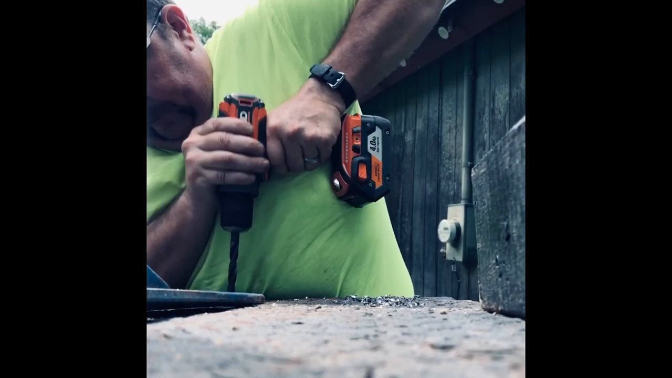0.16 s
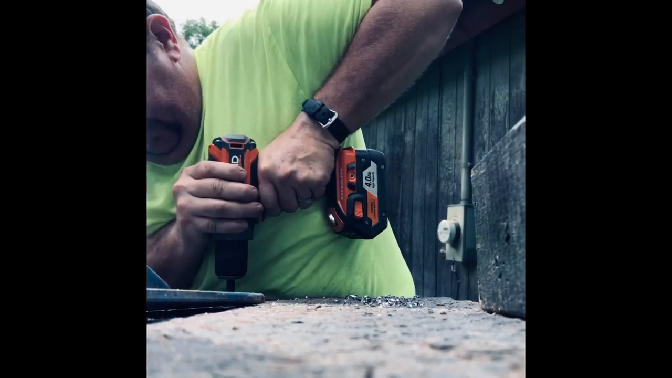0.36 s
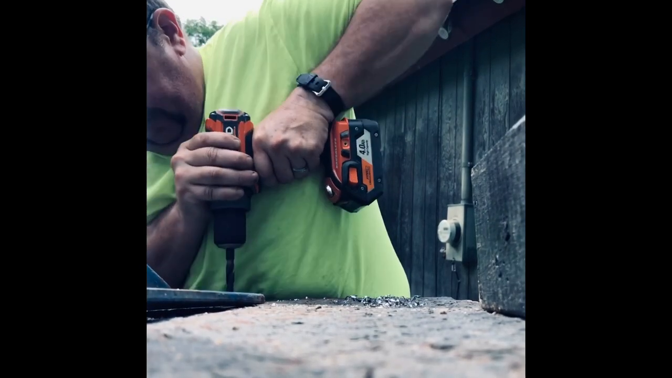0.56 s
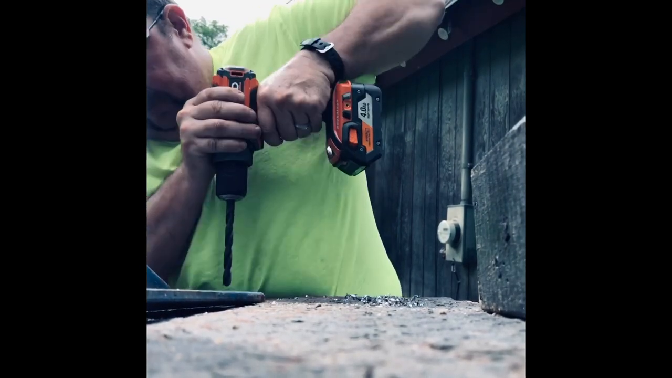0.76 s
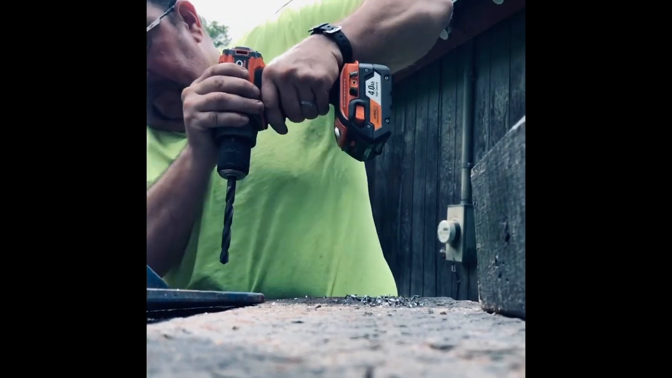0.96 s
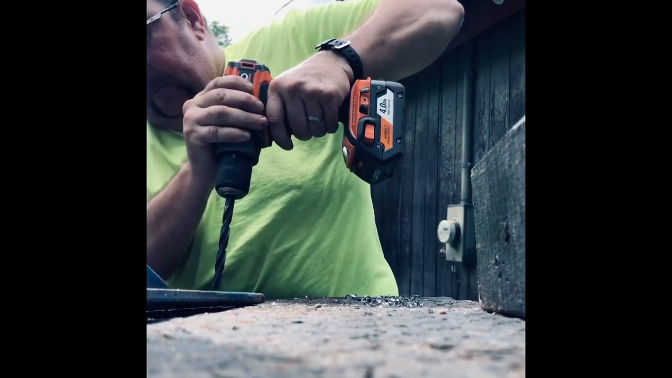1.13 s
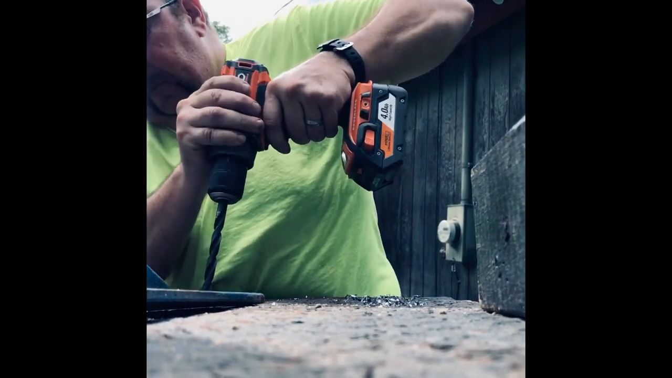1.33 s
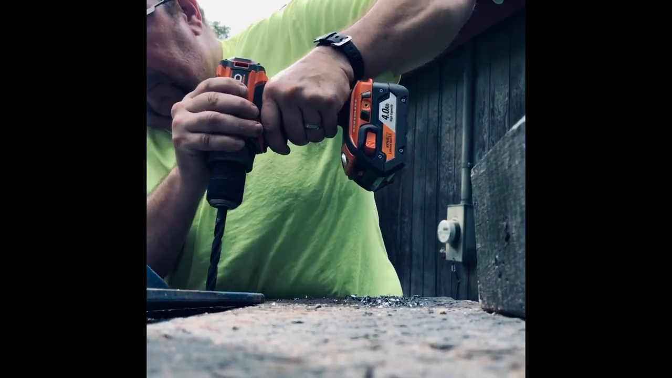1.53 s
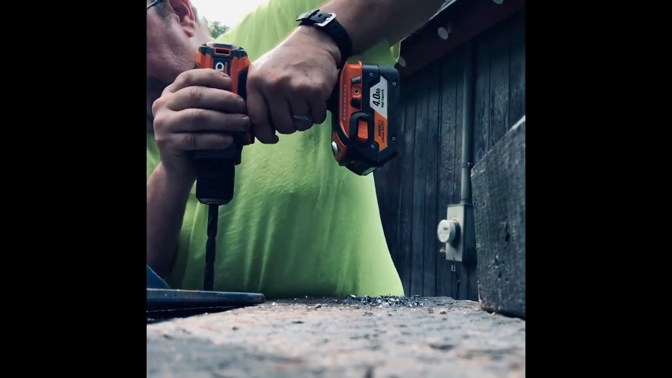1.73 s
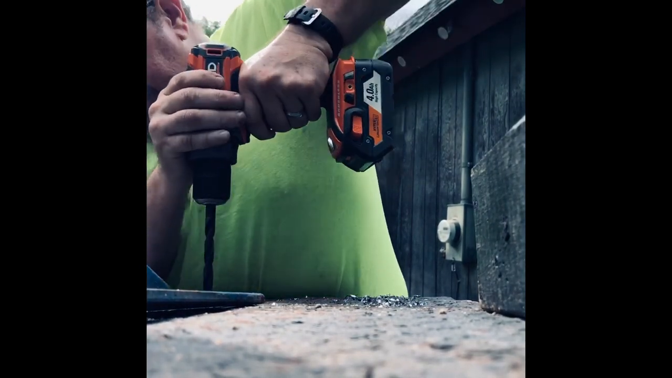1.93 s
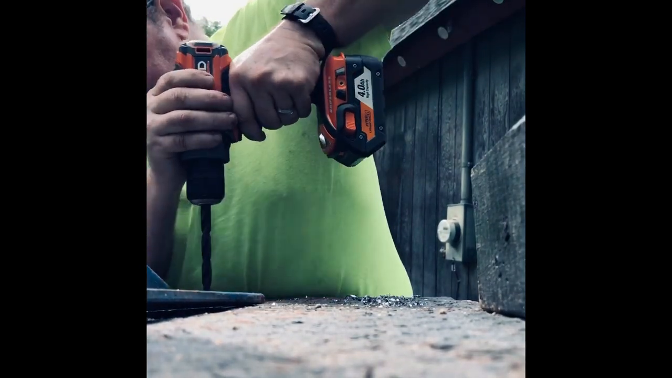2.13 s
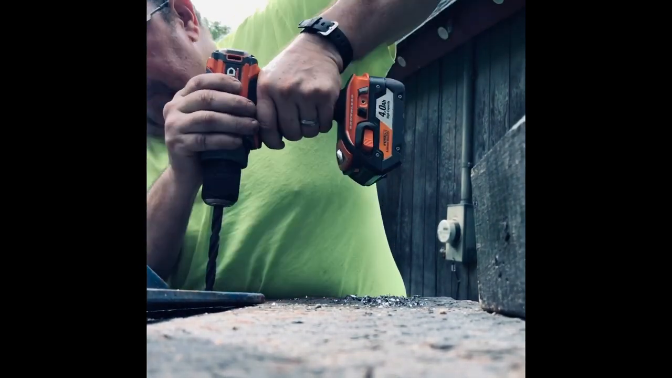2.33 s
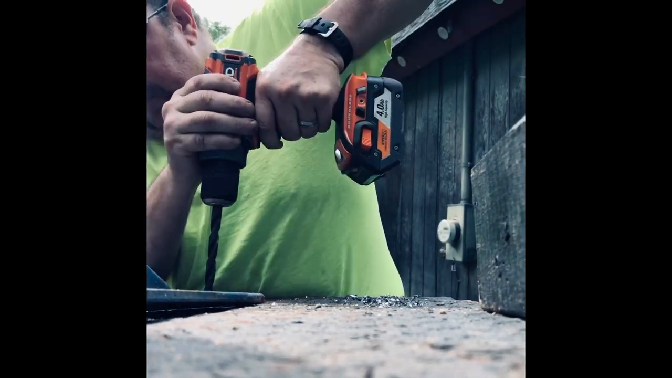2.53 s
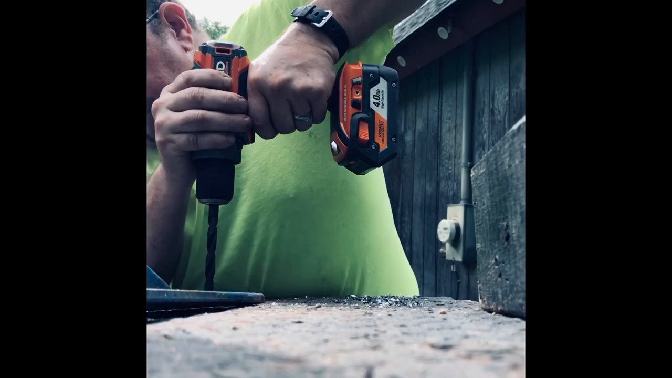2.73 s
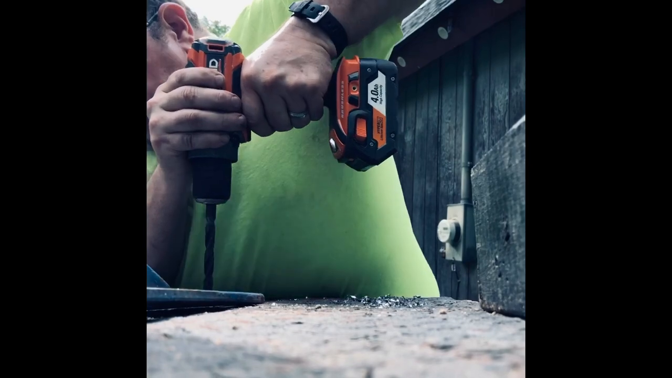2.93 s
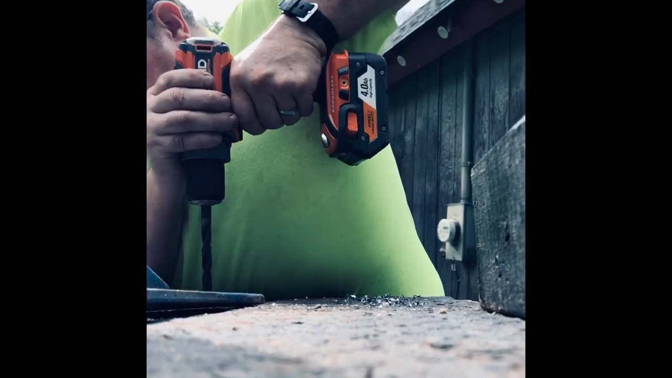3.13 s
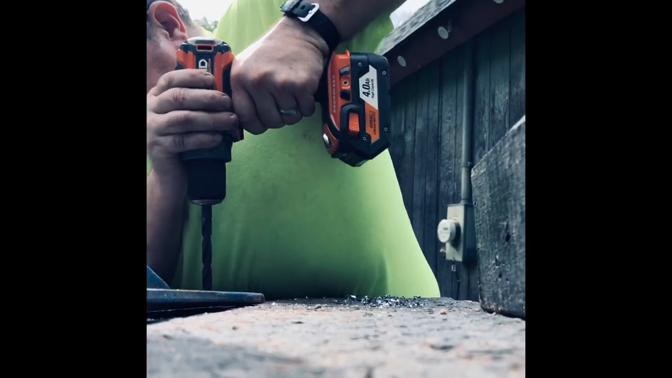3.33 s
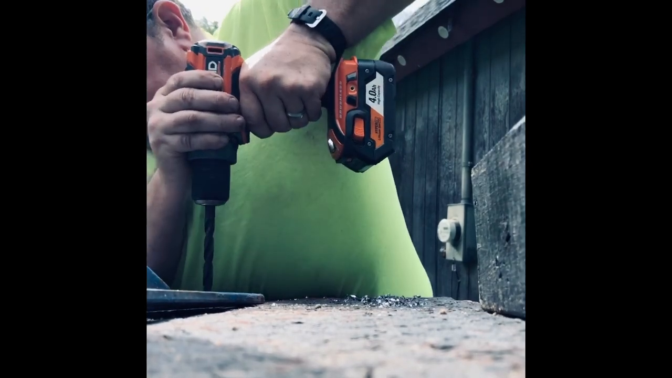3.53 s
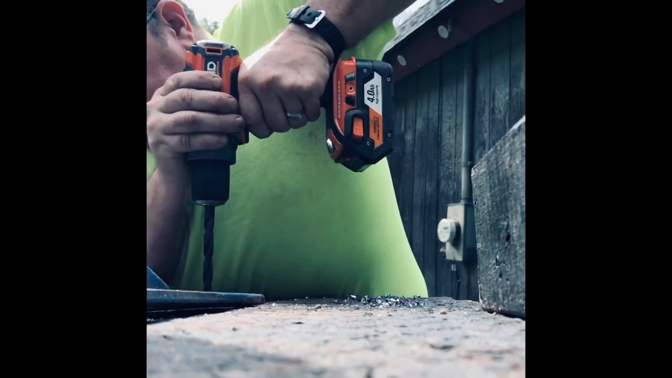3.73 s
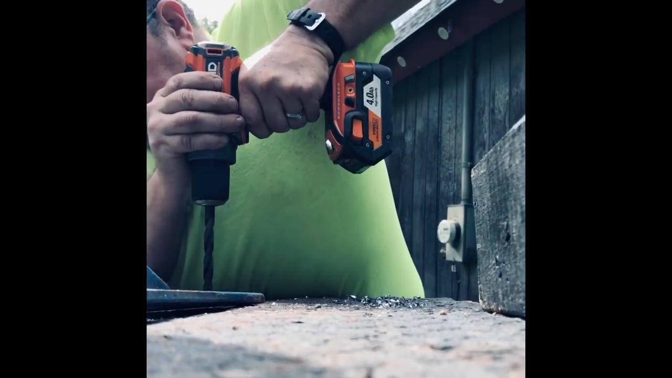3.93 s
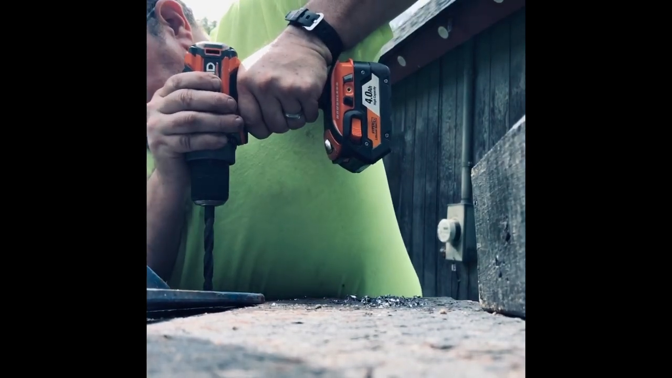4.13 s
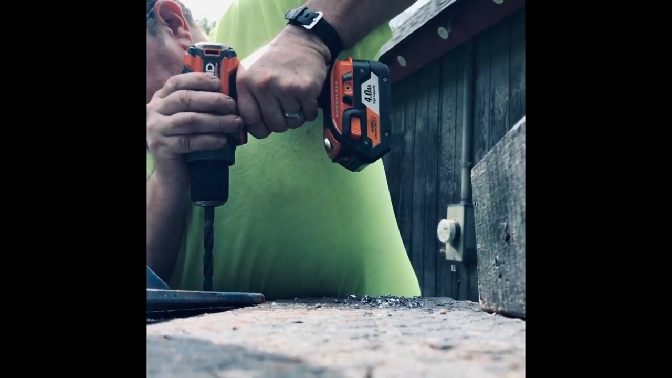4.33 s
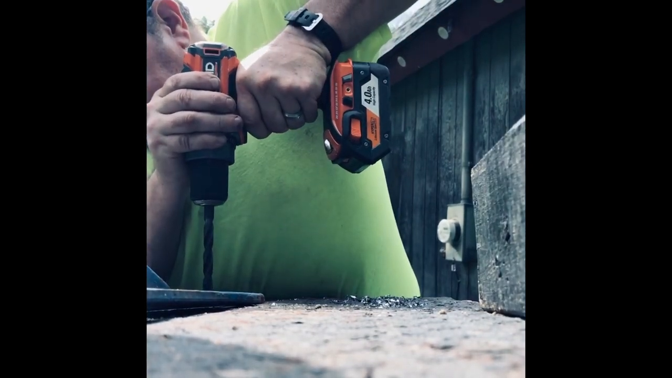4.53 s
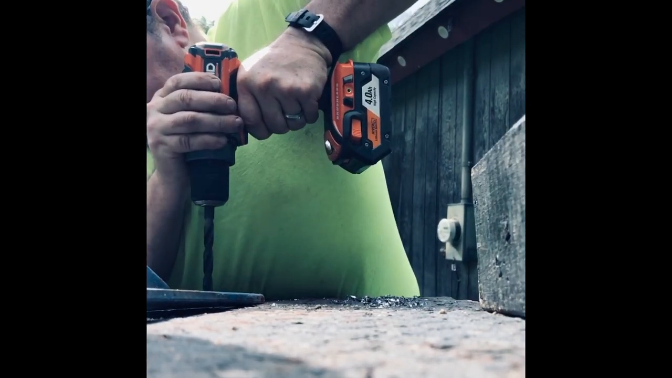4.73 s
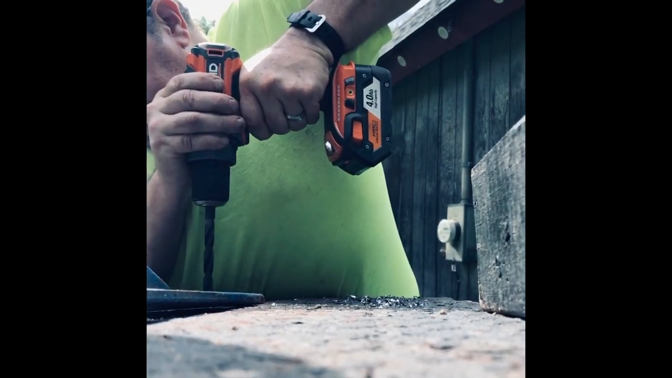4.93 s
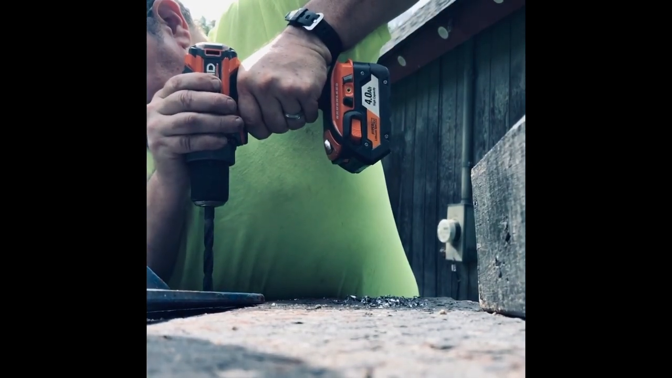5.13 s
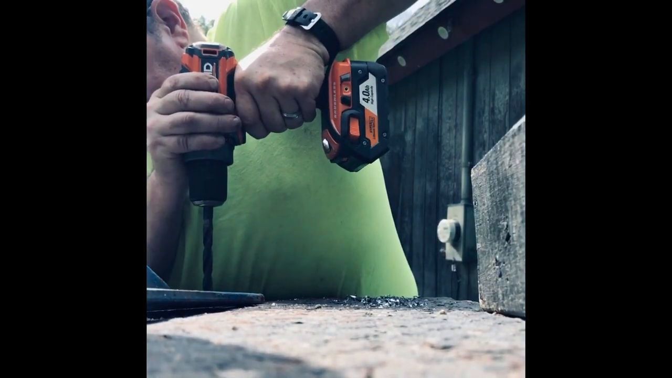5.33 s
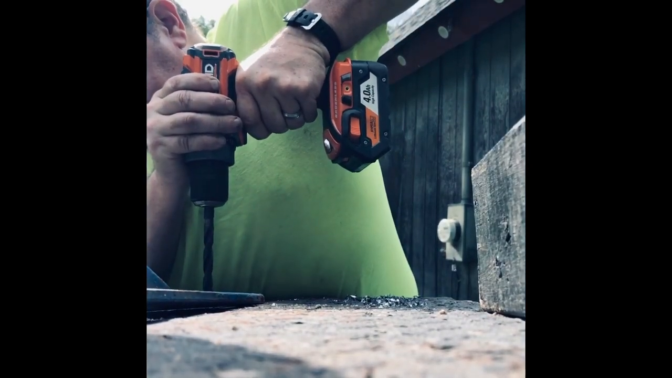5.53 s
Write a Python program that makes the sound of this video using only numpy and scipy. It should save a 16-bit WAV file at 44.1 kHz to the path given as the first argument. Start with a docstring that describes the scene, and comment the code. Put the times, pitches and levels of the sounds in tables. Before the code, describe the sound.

Close cordless drill whines and grinds through sheet steel, brakes to a stop, knocks in a quiet gap, then bores on, catching rhythmically.

```python
"""First the snap and grind of a bit in sheet steel, close to the microphone, and the whine of a cordless drill's gears.
The brake drops the pitch; in the pause the bit knocks and is set down, and a mains hum shows through the far yard.
After brief touches of the trigger a second, longer bore binds and catches once a turn.
Gears and whistle are sines that follow the motor speed, cutting and air are coloured noise, knocks are ringing modes;
a wall answers shortly, and the truck bed booms under the work."""
import sys
import numpy as np
from scipy import signal
from scipy.fft import rfft, irfft, next_fast_len
from scipy.io import wavfile
from scipy.ndimage import uniform_filter1d, map_coordinates

SR = 44100
rng = np.random.default_rng(int(sys.argv[2]) if len(sys.argv) > 2 else 0)


def dump(signal):
    """Clip the signal to [-1, 1] and save it as 16-bit WAV at the path in sys.argv[1]."""
    limited = np.clip(np.atleast_2d(signal).T, -1, 1)
    pcm = np.round(limited * 32767).astype(np.int16)
    wavfile.write(sys.argv[1], SR, pcm)


def linear_from_db(decibels):
    """Turn decibels (scalar or array-like) into linear amplitude factors; 0 gives 1."""
    return 10 ** (np.asarray(decibels, float) / 20)


N = 245195
T = np.arange(N) / SR  # seconds

# Far yard noise. Each row: frequency in Hz, relative density in dB per Hz.
YARD = [(18, -50), (35, -30), (64, -14), (93, -18), (125, 3), (170, -4.5), (335, -4), (430, -7.5),
        (1180, -13.5), (2270, -23.5), (3940, -21.5), (9000, -35.5), (15800, -56)]
# Mains hum: frequency in Hz, level in dB.
HUM = (120.5, -40.5)
YARD_DB, YARD_SWELL_DB, YARD_SWELL_S = -45, 3.5, (0.93, 1.52)  # level, rise, and when it rises

# Boom of the truck bed. Each row: frequency in Hz, relative density in dB per Hz.
BOOM = [(60, -50), (110, -13), (170, -7), (230, -2), (260, -1), (330, -18), (600, -70)]
# Shake of the truck bed. Each row: frequency in Hz, relative density in dB per Hz.
DEEP = [(20, -60), (35, -25), (48, -7), (65, 1.5), (95, 6), (130, -15), (250, -70)]
# Weight shifting on the truck. Each row: time in seconds, level in dB.
LEAN = [(0, -43), (.5, -47), (.66, -37), (.91, -42), (1.31, -66), (1.47, -38.5), (1.9, -54), (2.14, -62),
        (2.7, -60), (2.94, -34.5), (3.78, -40.5), (4.23, -56), (5.0, -51), (5.35, -52), (5.56, -59)]
# The boom's base level belongs to that side pressure; it grows in dB per dB and sinks as the bit binds.
BOOM_DB, BOOM_GROWS, BOOM_AT_DB, BOOM_SINKS_DB = -25.5, 0.85, -16, -3.5

# Trigger part-pressed. Each row: on in seconds, off in seconds, housing buzz in dB, the same at the end in dB.
TOUCH = [(1.898, 2.05, -34, -41), (2.659, 2.72, -45, -19)]
# Speed control singing during a touch. Each row: frequency in Hz, end frequency in Hz, level in dB.
SWITCH = [(10150, 9800, -41), (10200, 10450, -45)]
TOUCH_EDGE_S = 0.016

# Bit on the rim of the hole. Each row: start in seconds, relative level in dB.
KNOCK = [(.466, -9), (.483, -13), (.509, -9), (0.532, -3.5), (0.555, -11), (0.584, -17), (0.606, -23),
         (.694, -13), (1.434, -16), (1.444, -18.5), (1.466, -22), (1.483, -19), (1.496, -19.5), (1.51, -31),
         (1.539, -27.5), (1.607, -26), (1.665, -35)]
# Modes of the sheet when knocked. Each row: frequency in Hz, relative level in dB, 60 dB decay in seconds.
RIM = [(241, -14, 0.1), (315, -22, 0.36), (438, -2, 0.052), (493, 3, 0.053), (577, -2, 0.042),
       (1030, -13, 0.035)]
# Low tone already ringing as we begin: start in seconds, frequency in Hz, level in dB, 60 dB decay in seconds.
LINGERING_RING = (-1.2, 311.5, -35, 4)

# Single catches of the bit and knocks of the chuck.
# Each row: start in seconds, relative level in dB, centre in Hz, relative crackle level in dB.
CATCH = [(0.0124, -2.5, 3390, -13), (0.0196, 0, 4200, -15), (0.0259, 0.5, 4170, -21),
         (0.0444, -7, 3450, -10), (0.4964, -2, 4120, -24), (0.603, -4.5, 3480, -8),
         (0.6384, -7.5, 3350, 2.5), (0.6764, -9.5, 3650, -4), (0.8264, -7, 2740, -31),
         (1.4247, -35, 3900, -8), (1.4855, -35, 3440, -10), (1.914, -29, 3100, -7),
         (2.424, -24.5, 3700, -20), (2.4897, -28, 4920, -12), (2.4974, -32.5, 2890, -9),
         (2.6708, -28, 3126, -5), (2.6963, -15, 2990, -18), (2.7282, 3, 3090, -36),
         (2.8087, -0.5, 3050, -23), (2.8792, -14, 3190, -21), (3.0174, -5, 3163, -9),
         (3.0794, -6, 3130, -12)]
# A binding bit catches at this part of each turn, give or take the scatter (both in turns).
SNAG_TURN, SNAG_SCATTER = 0.5, 0.05
SNAG_DB, SNAG_SPREAD_DB, SNAG_TOP_DB = -3.5, 1, -27  # relative levels as in CATCH
SNAG_HZ, SNAG_OCTAVES, SNAG_OVER = 3158, 0.2014, 0.4  # centre, its spread, the binding it takes

# Bit against steel, one table a spell. Each row: time in seconds, side pressure on the panel in relative dB,
# cutting in relative dB.
CONTACT = [
    [(0, -17.5, -18.5), (.033, -21, -22), (.04, -21.5, -21), (.09, -17.5, -18), (.14, -24.5, -24),
     (.174, -24, -32), (.272, -23.5, -33.5), (.288, -17.5, -27), (.406, -26, -27), (.46, -21.5, -27.5),
     (.486, -15.5, -23.5), (.58, -16, -29), (.672, -16, -30), (.766, -23.5, -40), (.852, -37, -42),
     (.914, -32, -29.5), (.942, -47, -83), (.95, -47, -71)],
    [(1.41, -62, -71), (1.422, -41, -50), (1.508, -44, -61), (1.586, -52, -77), (1.66, -63, -72)],
    [(1.9, -55, -64), (1.91, -48, -47.5), (2.0, -33.5, -35), (2.05, -32.5, -36.5), (2.075, -42, -58)],
    [(2.66, -52, -51), (2.68, -41, -43), (2.7, -27.5, -28), (2.726, -22, -23), (2.75, -14, -20),
     (2.8, -15.5, -21), (2.95, -16, -22.5), (3.47, -13.5, -20), (3.64, -18.5, -22), (4.25, -15.5, -18.5),
     (4.48, -17.5, -17.5), (4.85, -16.5, -17.5), (5.56, -19, -19)],
]
# Resonances of the bit. Each row: centre in Hz, width in Hz, relative height in dB.
BIT_MODES = [(1560, 59, 8), (2345, 18, 14.5), (2650, 28, 11.5), (2740, 20, 7), (2950, 54, 9.5),
             (3440, 16, 9), (3610, 16, 13), (3734, 105, 10.5), (4104, 17, 14), (4380, 107, 12.5),
             (4844, 68, 12.5), (5720, 100, 21)]
# Resonances of the panel. Each row: centre in Hz, width in Hz, relative height in dB.
PANEL = [(367.6, 21, 4.5), (506, 53, 3), (617.5, 2.9, 6), (1036, 29, 3)]
# Cutting noise. Each row: frequency in Hz, relative density in dB per Hz.
GRIND = [(500, -60), (900, -33), (1500, -2), (2000, -3), (2500, -1), (3300, 0), (4200, -3.5), (5000, -11),
         (6000, -23.5), (7500, -15), (12000, -60)]
# Panel rumble. Each row: frequency in Hz, relative density in dB per Hz.
RUMBLE = [(150, -41), (300, -2), (360, -5), (430, -4), (510, -2), (800, -6), (1500, -6), (2200, -13.5),
          (4000, -93)]
# Air, brushes and rubbing. Each row: frequency in Hz, relative density in dB per Hz.
HISS = [(1500, -81), (2940, 3), (5000, -2.5), (6870, -3.5), (8250, 0.5), (11100, -12), (15800, -13.5)]
SPRAY_DB, RUB_DB = -7.5, -18  # hiss relative to the cutting, and to the side pressure
AIR_DB, AIR_HZ, AIR_POWER = -28, 3330, 1.44  # relative air hiss at that gear mesh, its power of speed
AIR_CHOKE_DB = -6.5  # change of all the hiss when the bit binds hard
BRUSH_FOLLOWS, BRUSH_AT_DB = 0.29, -29  # brushes follow the cut (dB per dB), from that cutting level

# Motor speed before the sag, one table a burst. Each row: time in seconds, gear mesh in Hz.
SPEED = [
    [(.04, 2950), (.065, 2847), (.102, 2210), (.125, 2255), (.158, 2717), (.18, 3040), (.206, 3180),
     (.28, 3320), (.3, 3206), (.34, 3180), (.38, 3120), (.49, 3274), (.74, 3330), (.8, 3056), (.828, 2950),
     (.853, 2580), (.86, 2372), (.88, 1910), (.895, 1541), (.91, 1235), (.924, 982)],
    [(2.69, 498), (2.731, 1560), (2.75, 2500), (2.79, 2966), (2.82, 3120), (2.85, 3135), (2.95, 3180),
     (3.03, 3180), (3.12, 3046), (3.25, 3027), (3.45, 3031), (3.65, 3040), (4.05, 2950), (4.25, 2964),
     (4.65, 2950), (4.85, 2904), (5.47, 2919), (5.51, 2960), (5.56, 3064)],
]
# How hard the bit binds each turn. Each row: time in seconds, binding (1 = hard).
BIND = [(0, 0.084), (2.8, 0.26), (3.6, 0.17), (4.0, 0.32), (4.25, 0.54), (4.45, 0.92), (5.4, 0.93),
        (5.56, 0.19)]
# Load on the gear teeth. Each row: time in seconds, relative level in dB.
TORQUE = [(0, -31), (.07, -11), (.1, -7), (.145, 0), (.16, -11), (.2, -6.5), (.26, -17), (.34, -5),
          (.44, -8.5), (.49, -18), (.6, -9), (.74, -8), (.82, -22), (.83, 1.5), (.9, -12.5), (2.74, -30),
          (2.755, -5), (2.79, 5.5), (2.82, -7), (2.85, 6), (2.89, -4), (2.95, 0.5), (3.25, -4), (3.65, 0.5),
          (4.05, 4), (4.45, 0.5), (4.85, 0), (5.05, 0.5), (5.25, -1.5), (5.47, 0), (5.51, 6), (5.56, -3)]
# Whine by its pitch. Each row: frequency in Hz, relative level in dB.
GEARBOX = [(700, -62), (1500, -13), (2200, -21), (2600, -12.5), (2890, -18.5), (2950, -18), (3050, -9),
           (3150, -11), (3320, -11)]
# Whistle by its pitch. Each row: frequency in Hz, level in dB.
WHISTLE_LEVEL = [(4900, -60), (5250, -24.5), (5550, -20), (5900, -29), (6600, -24), (7000, -36.5),
                 (7250, -33), (7400, -26), (7490, -25.5), (7700, -20), (7880, -33)]
# Buzz partials. Each row: multiple of half the mesh, relative level in dB.
BUZZ = [(1, 0), (3, -20), (4, -15), (5, -17), (6, -23)]
# Housing resonance that lifts any buzz partial passing through: centre in Hz, width in Hz, lift in dB.
HOUSING = (3050, 450, 20)
# Relative levels in dB: fourth harmonic of the whine, second of the whistle.
OVERTONE_DB = (-35, -22)
MESH_PER_TURN, TURN_AT_S = 199.7, 4.8158  # mesh cycles a chuck turn; a moment when a turn begins
UNLOAD_DB, UNLOAD_NARROW = -19, 3  # depth (at full binding) and narrowness of the gap in the whine each turn
WHISTLE = 2.3765  # whistle pitch over gear mesh
CLIMB_HUSH_DB, CLIMB_HZ_PER_S = -12, 12000  # the whistle is held down while the motor climbs that fast
BRAKE_HUSH_S, BRAKE_HUSH_DB = 0.04, -25  # the brake hushes the whistle in that time
BRAKE_S, BRAKE_DB, BRAKE_FADE_HZ = 0.8265, -20, 2520  # brake grips; its relative buzz, fading under that mesh
JAM, JAM_DB, JAM_HZ_PER_S = 1.29, -24, 15000  # squeal over mesh, full when a jam drags the motor down that fast
SLACK_DB, SLACK_UNDER_DB = -33, -6  # relative buzz of loose teeth below that load


def unit(x):
    """Scale to rms 1."""
    return x / np.sqrt(np.mean(x ** 2) + 1e-20)


def curves(*tables, rest=-120):
    """One value per sample for each column; rest where no table runs."""
    out = np.full((len(tables[0][0]) - 1, N), float(rest))
    for s, *columns in map(np.transpose, tables):
        on = (T >= s[0]) & (T <= s[-1])
        out[:, on] = [np.interp(T[on], s, column) for column in columns]
    return out


def wobble(rate):
    """A smooth random curve, rate knots a second."""
    return map_coordinates(rng.standard_normal(int(N / SR * 1200)), [T * rate])


def level_at(spectrum, hz):
    """(Hz, dB) points read on a log axis."""
    at, db = np.transpose(spectrum)
    return np.interp(np.log(hz), np.log(at), db)


def shaped(x, spectrum, modes=(), lift_db=0):
    """x coloured by (Hz, dB) points, with resonances standing out of it, at rms 1."""
    m = next_fast_len(N + 8192)
    hz = np.fft.rfftfreq(m, 1 / SR)
    peaks = sum(linear_from_db(level + lift_db) ** 2 / (1 + (2 * (hz - centre) / width) ** 2)
                for centre, width, level in modes)
    gain = linear_from_db(level_at(spectrum, hz + 1)) * np.sqrt(1 + peaks)
    return unit(irfft(rfft(x, m) * gain, m)[:N])


def yard():
    """Far outdoor noise, swelling a little in the pause, and a nearly steady mains hum."""
    hz, db = HUM
    hum = linear_from_db(db + 0.7 * wobble(6)) * np.sin(2 * np.pi * hz * T + 0.2 * wobble(6))
    far_db = YARD_DB + np.interp(T, YARD_SWELL_S, [0, YARD_SWELL_DB]) + 0.32 * wobble(5.8)
    return linear_from_db(far_db) * shaped(rng.standard_normal(N), YARD) + hum


def truck(bind):
    """The whole bed booms under the pressure of the bit and shakes as the weight on it shifts."""
    pressure_db = curves(*CONTACT)[0]
    slow_torque_db = uniform_filter1d(curves(TORQUE)[0], size=SR // 4)
    boom_db = BOOM_DB + BOOM_GROWS * (pressure_db - BOOM_AT_DB) + BOOM_SINKS_DB * bind + 0.39 * slow_torque_db
    boom = linear_from_db(boom_db + 1.8 * wobble(6.5) + 3.0 * wobble(30)) * shaped(rng.standard_normal(N), BOOM)
    shake = linear_from_db(curves(LEAN)[0]) * shaped(rng.standard_normal(N), DEEP)
    return boom + shake


def trigger():
    """Part-pressed trigger: thin high tones, and the housing resonance rattled by the slow motor."""
    rattle = rng.standard_normal(N) * linear_from_db(3.9 * wobble(220))
    housing = shaped(rattle, [(1000, -80), (2000, -30), (2800, -5), (3150, 9), (3500, -20), (4500, -46),
                              (9000, -80)])
    out = np.zeros(N)
    for on, off, start_db, end_db in TOUCH:
        gate = np.clip(np.minimum(T - on, off + TOUCH_EDGE_S - T) / TOUCH_EDGE_S, 0, 1) ** 2
        out += gate * linear_from_db(np.interp(T, [on, off], [start_db, end_db])) * housing
        for hz, end_hz, db in SWITCH:
            pitch = np.interp(T, [on, off], [hz, end_hz])
            out += gate * linear_from_db(db + 2.3 * wobble(110)) * np.sin(2 * np.pi * np.cumsum(pitch) / SR)
    return out


def knocks():
    """Every knock rings the sheet's modes at new strengths, over one low tone that fades from the start."""
    out, t = np.zeros(N + SR), np.arange(SR // 2) / SR
    for s, db in KNOCK:
        spread_db = rng.normal(0, 2.5, len(RIM))
        ring = sum(linear_from_db(level + more - 60 * t / t60) * np.sin(2 * np.pi * hz * t)
                   for (hz, level, t60), more in zip(RIM, spread_db))
        out[round(s * SR):][:len(t)] += linear_from_db(db - 2.5) * ring * (1 - np.exp(-t / 0.0025))
    s, hz, db, t60 = LINGERING_RING
    lingering_db = db - 60 * (T - s) / t60 + 2.1 * wobble(24.5)
    return out[:N] + linear_from_db(lingering_db) * np.sin(2 * np.pi * hz * T)


def snags(angle, bind):
    """One catch a turn where the bit binds hard enough, as rows like those of CATCH."""
    turns = angle / (2 * np.pi)
    whole = np.arange(np.ceil(turns[0]), turns[-1] - 1)
    chance = rng.standard_normal((len(whole), 3))
    s = np.interp(whole + SNAG_TURN + SNAG_SCATTER * chance[:, 0], turns, T)
    db = SNAG_DB + SNAG_SPREAD_DB * chance[:, 1]
    hz = SNAG_HZ * 2 ** (SNAG_OCTAVES * chance[:, 2])
    rows = np.transpose([s, db, hz, np.full(len(s), SNAG_TOP_DB)])
    return list(rows[np.interp(s, T, bind) > SNAG_OVER])


def catches(angle, bind):
    """Each catch is a rough snap that rings the modes of the bit near it, with a crackle on top."""
    out, t = np.zeros(N + SR), np.arange(SR // 20) / SR
    modes, widths, levels = np.transpose(BIT_MODES)[..., None]
    for s, db, hz, top_db in CATCH + snags(angle, bind):
        noise = rng.standard_normal((3, len(t)))
        rough = unit(signal.lfilter([1], [1, -1.7, 0.7225], noise[:2]))  # spreads the snap about its centre
        carrier = rough[0] * np.sin(2 * np.pi * hz * t) + rough[1] * np.cos(2 * np.pi * hz * t)
        snap = 1.06 * carrier * linear_from_db(-60 * t / 0.029)
        # modes far from the snap, in octaves, ring less
        near_db = levels - 15.0 - 14 * np.abs(np.log2(modes / hz)) + rng.normal(0, 3.0, modes.shape)
        decay = np.exp(-2.5 * np.pi * widths * t)
        ring = np.sum(linear_from_db(near_db) * decay * np.sin(2 * np.pi * modes * t), axis=0)
        bright = unit(uniform_filter1d(np.gradient(noise[2]), size=3))
        crackle = linear_from_db(top_db + 8.0 - 60 * t / 0.021) * bright
        attack = 1 - np.exp(-t / 0.00069)
        out[round(s * SR):][:len(t)] += linear_from_db(db - 8.5) * (snap + ring + crackle) * attack
    return out[:N]


def bit(angle, bind, hz):
    """Chips tear off in clumps that ring the bit; the panel rumbles; air and brushes hiss most between bites."""
    rumble_db, grind_db = curves(*CONTACT)
    bite = bind * np.tanh(2.4 * np.cos(angle + 1.4 + 0.2 * wobble(12)))  # the edge digs in for half a turn
    chips = rng.standard_normal(N) * linear_from_db(1.0 * wobble(90) + 3.3 * wobble(600))
    grind = linear_from_db(grind_db + 2.5 + 3.1 * bite) * shaped(chips, GRIND, BIT_MODES, lift_db=-1.8)
    thuds = rng.standard_normal(N) * linear_from_db(1.36 * wobble(35) + 1.9 * wobble(140))
    rumble = linear_from_db(rumble_db - 1.9 + 1.0 * bite) * shaped(thuds, RUMBLE, PANEL, lift_db=2.5)
    flutter = rng.standard_normal(N) * linear_from_db(0.38 * wobble(25) + 1.54 * wobble(60) + 0.38 * wobble(550))
    spray = linear_from_db(grind_db + SPRAY_DB)
    rub = linear_from_db(rumble_db + RUB_DB)
    air = linear_from_db(AIR_DB + BRUSH_FOLLOWS * (grind_db - BRUSH_AT_DB)) * (hz / AIR_HZ) ** AIR_POWER
    hiss = np.linalg.norm([spray, rub, air], axis=0)  # powers add
    hiss = hiss * linear_from_db(2.5 + AIR_CHOKE_DB * bind - 2.7 * bite) * shaped(flutter, HISS)
    return grind + rumble + hiss


def shaft():
    """Mesh phase and chuck angle; the motor sags when the bit binds."""
    hz = curves(*SPEED, rest=100)[0]  # the motor is silent at this resting value
    cycles = np.cumsum(hz) / SR
    angle = 2 * np.pi * (cycles - cycles[round(TURN_AT_S * SR)]) / MESH_PER_TURN
    bind = curves(BIND)[0]
    sag = 0.019 * bind * np.cos(angle + 0.3) + 0.0031 * wobble(45)
    mesh = 2 * np.pi * np.cumsum(hz * (1 + sag)) / SR
    return mesh, angle, bind, hz


def motor(mesh, angle, bind, hz):
    """Gear whine that dips as teeth unload once a turn, a higher whistle, jam squeal and buzz of the teeth."""
    torque_db, running = curves(TORQUE)[0], hz > 200
    slope = np.gradient(hz) * SR  # Hz per second
    braking = (T > BRAKE_S) & (T < SPEED[1][0][0])

    gap = (0.5 + 0.5 * np.cos(angle - 2.6)) ** UNLOAD_NARROW
    load_db = bind ** 1.87 * (3.0 + UNLOAD_DB * gap)
    flicker_db = 0.62 * wobble(21.98) + 0.32 * wobble(70) + 1.2 * wobble(300)
    tone = np.sin(mesh + 0.23 * wobble(250)) + linear_from_db(OVERTONE_DB[0]) * np.sin(4 * mesh + wobble(250))
    whine = linear_from_db(level_at(GEARBOX, hz) + torque_db + load_db + flicker_db) * tone

    climbing = uniform_filter1d(np.clip(slope / CLIMB_HZ_PER_S, 0, 1), size=500)
    hush_db = CLIMB_HUSH_DB * climbing
    hush_db = hush_db + BRAKE_HUSH_DB * braking * np.clip((T - BRAKE_S) / BRAKE_HUSH_S, 0, 1)
    phase = WHISTLE * mesh + 0.34 * wobble(330)
    whistle_db = level_at(WHISTLE_LEVEL, WHISTLE * hz) + hush_db + 0.53 * wobble(20) + 2.2 * wobble(110)
    whistle = linear_from_db(whistle_db) * (np.sin(phase) + linear_from_db(OVERTONE_DB[1]) * np.sin(2 * phase))

    drag = uniform_filter1d(np.clip(-slope / JAM_HZ_PER_S, 0, 1), size=500) ** 2 * ~braking
    squeal = linear_from_db(JAM_DB + 2.5 * wobble(82)) * drag * np.sin(JAM * mesh + 0.5 * wobble(390))

    centre, width, lift_db = HOUSING
    buzz = np.zeros(N)
    for k, db in BUZZ:
        housing_db = lift_db / (1 + (2 * (k * hz / 2 - centre) / width) ** 2)
        partial_db = db + 2.0 * wobble(89.47) + housing_db
        buzz += linear_from_db(partial_db) * np.sin(k * mesh / 2 + 0.59 * wobble(300))
    fading = np.clip(hz / BRAKE_FADE_HZ, 0, 1) ** 3
    slack = linear_from_db(SLACK_DB) * (torque_db < SLACK_UNDER_DB)
    buzz = buzz * (linear_from_db(BRAKE_DB) * braking * fading + slack)
    return np.sqrt(2) * running * (whine + whistle + squeal + buzz)


def scene():
    """Drill close by, with a short answer from the wall, over the far yard."""
    mesh, angle, bind, hz = shaft()
    drill = truck(bind) + trigger() + knocks() + catches(angle, bind)
    drill = drill + bit(angle, bind, hz) + motor(mesh, angle, bind, hz)
    t = np.arange(SR // 10) / SR
    wall = rng.standard_normal(len(t)) * linear_from_db(-60 * t / 0.11)
    answer = linear_from_db(-14.5) * signal.fftconvolve(drill, wall / np.linalg.norm(wall))[:N]
    return (drill + answer + yard())[None]


def top_cut(x):
    """Nothing passes above the cut-off."""
    return signal.sosfilt(signal.butter(12, 17020, fs=SR, output="sos"), x)


def record(dry):
    """The microphone chain rounds off peaks near full scale and passes nothing above its band limit."""
    soft = dry / (1 + np.abs(dry / 0.88) ** 6) ** (1 / 6)
    in_band = np.fft.rfftfreq(N, 1 / SR) < 15850
    limited = irfft(rfft(soft) * in_band, N)
    return top_cut(limited)


dry = scene()
out = record(dry)
dump(out)
```